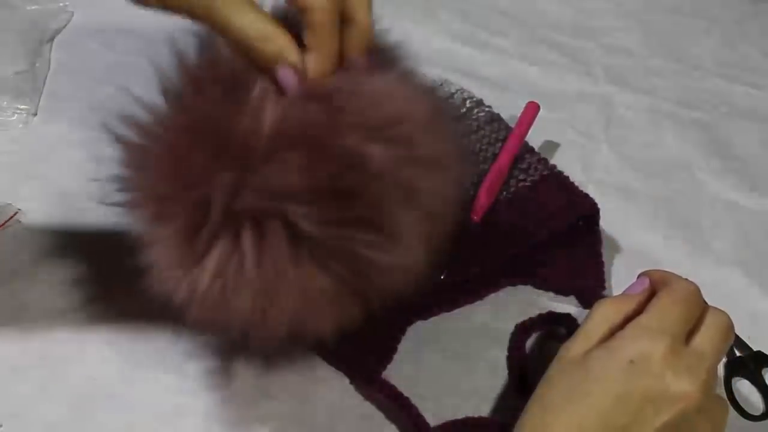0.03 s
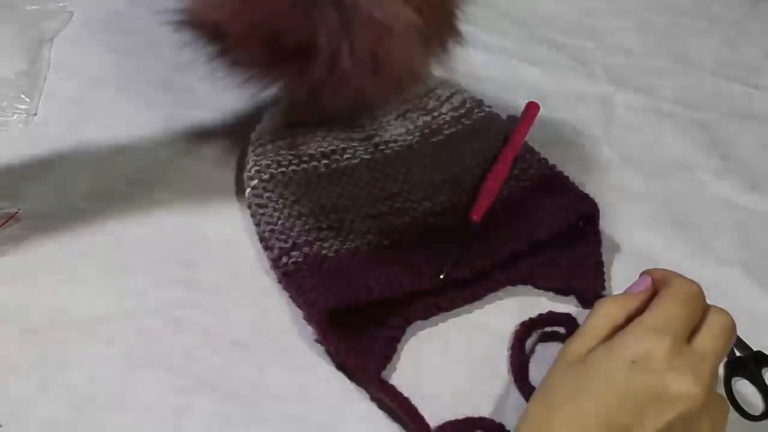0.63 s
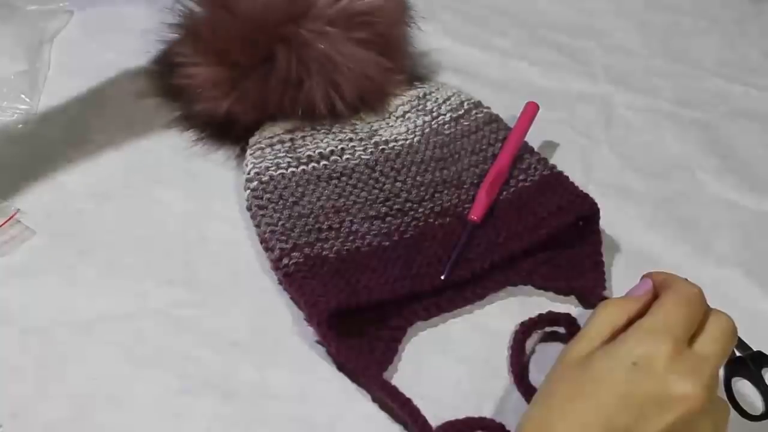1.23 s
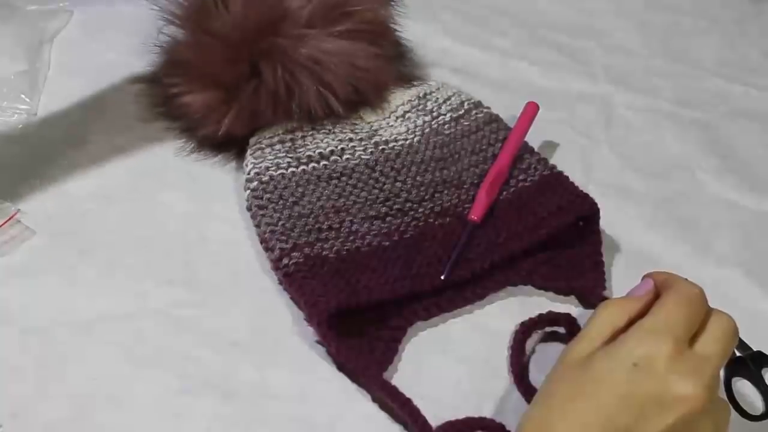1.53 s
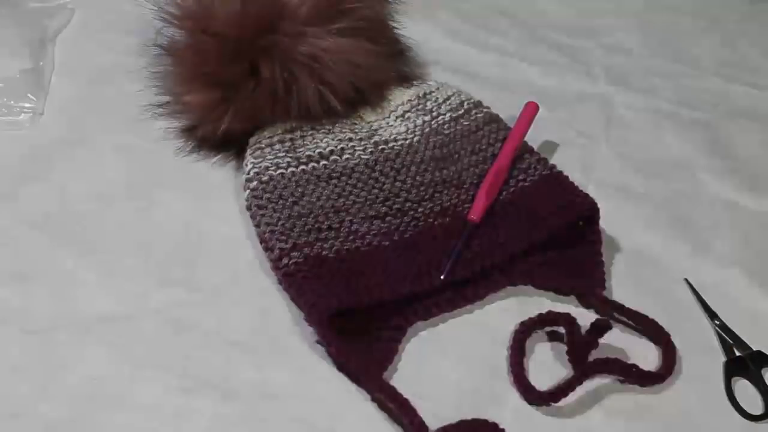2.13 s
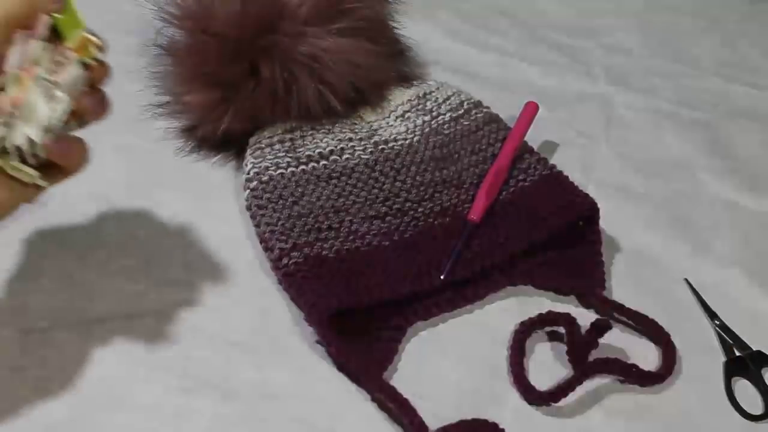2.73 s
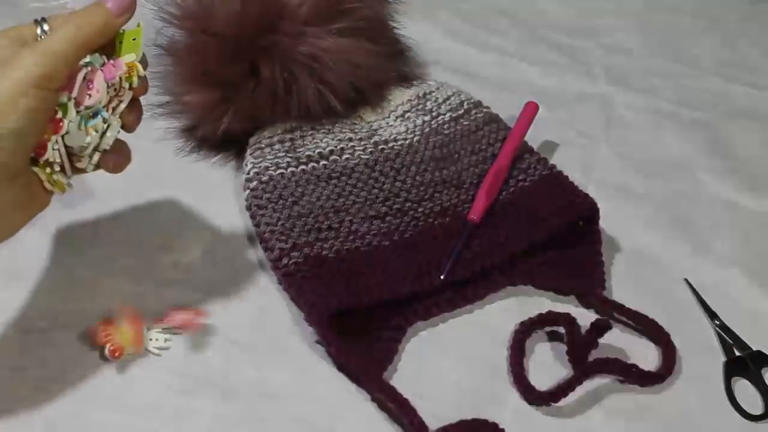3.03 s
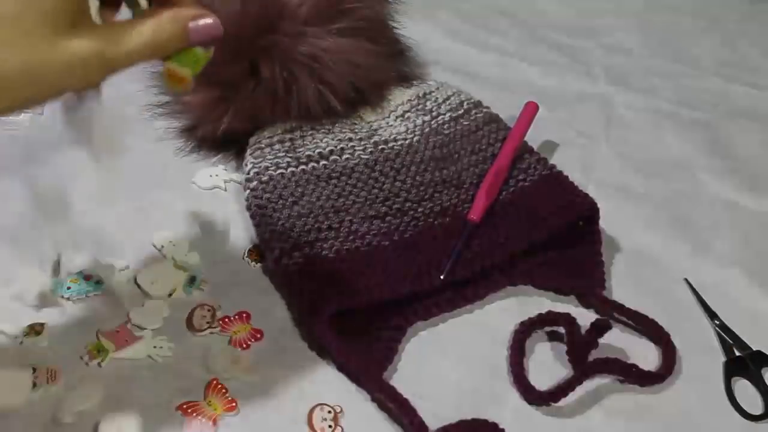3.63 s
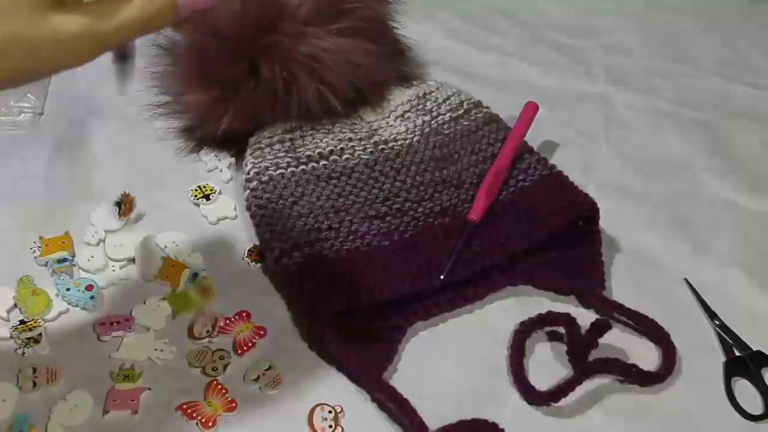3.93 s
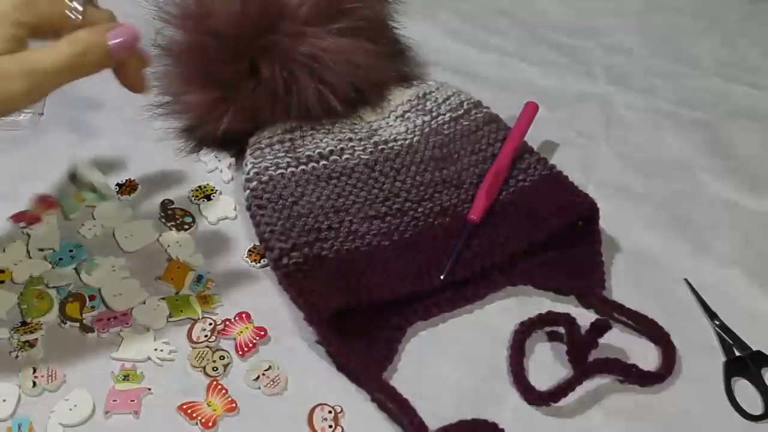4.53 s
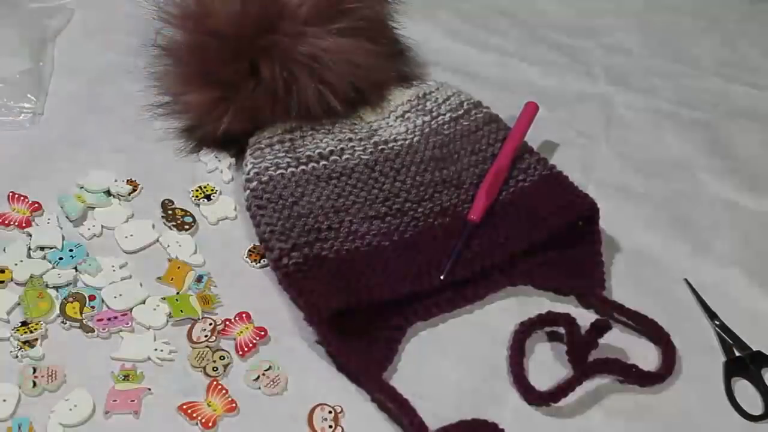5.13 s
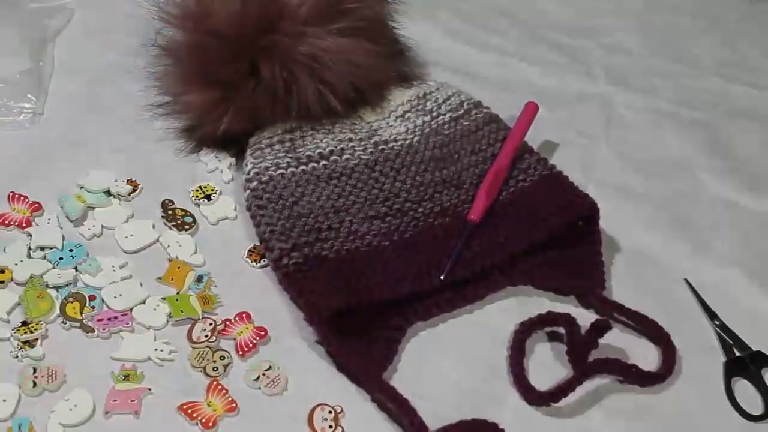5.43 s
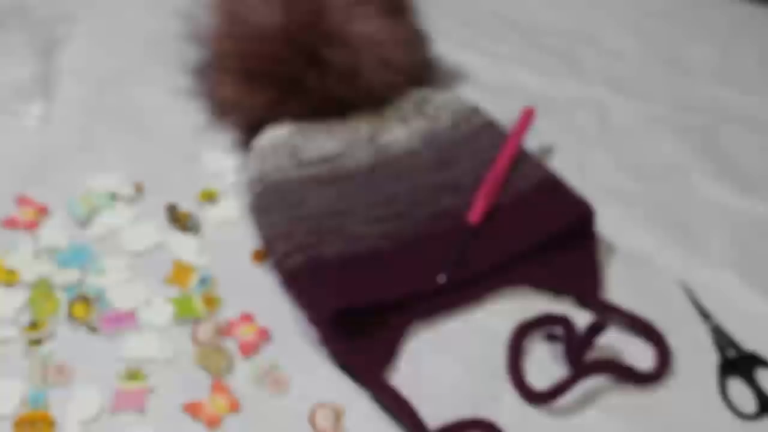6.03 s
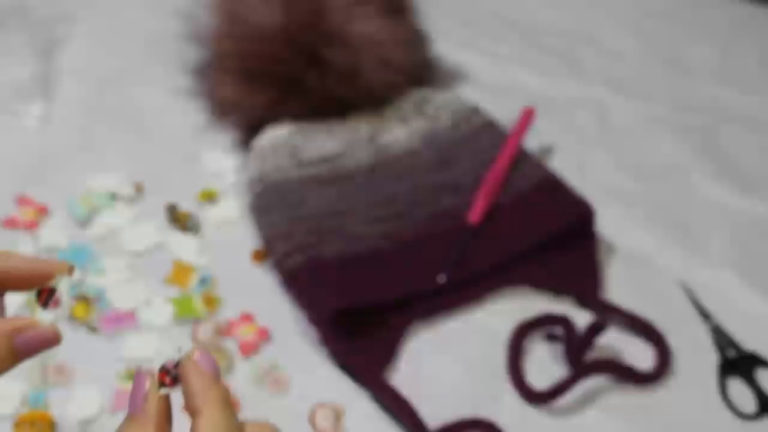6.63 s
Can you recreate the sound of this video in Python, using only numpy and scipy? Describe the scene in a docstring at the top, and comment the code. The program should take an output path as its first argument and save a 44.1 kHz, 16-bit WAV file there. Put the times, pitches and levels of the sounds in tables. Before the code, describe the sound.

Soft, steady room noise opens, with a few faint high ticks in the first second and a gentle swish of a fur pompom being set down at about 1.2 seconds. At 1.7 seconds the noise drops abruptly to near silence. A hand rustles lightly just before 3 seconds, and a handful of small, flat, hard buttons starts falling onto a cloth-covered table. A few click down first, there is a brief lull, and from 3.4 seconds comes a dense, bright clatter with dull cushioned pats underneath. The sharpest clicks slightly overload the microphone, and the small room adds a short reverberation. Last spurts with a thin, high jingle follow from 4 seconds until the heap settles at about 4.8 seconds. Faint hiss and a low hum remain, dipping briefly near 6 seconds. Hands rustle softly over the cloth at around 6.8 seconds.

```python
"""Room noise is heard first, with a few faint ticks and a soft brush of fur; then it drops at once.
Hands rustle, and a handful of flat, hard buttons is tipped onto a cloth-covered table in a small room.
Collisions excite the buttons' bending modes as bright clicks; landings, cushioned by the cloth, drive
the table's modes as dull pats. The sharpest clicks overload the microphone. A faint hum follows."""
import sys
import numpy as np
from scipy import signal
from scipy.fft import rfft, irfft
from scipy.io import wavfile
from scipy.ndimage import uniform_filter1d

SR = 44100
rng = np.random.default_rng(int(sys.argv[2]) if len(sys.argv) > 2 else 0)


def persist_wave(psi):
    """Save psi, clipped to +-1, as 16-bit WAV."""
    counts = np.round(np.clip(psi, -1, 1) * 32767).astype(np.int16)
    wavfile.write(sys.argv[1], SR, np.atleast_2d(counts).T)


N = 303408
TIME = np.arange(N) / SR
DROP_S, TIPPED_S, SETTLED_S = 1.727, 2.95, 4.765   # the noise drops; the hand opens; the heap lies still


def from_db(db):
    """Decibels to amplitude ratio."""
    return 10 ** (np.asarray(db) / 20)


def unit_rms(x):
    """Normalisation to rms 1."""
    return x / np.sqrt(np.mean(x ** 2) + 1e-20)


def curves(rows):
    """Linear interpolation of each column over the times in the first."""
    times, *columns = np.transpose(rows)
    return [np.interp(TIME, times, column) for column in columns]


def add(out, start_s, sound):
    """Superposition of a sound from a given time."""
    at = int(start_s * SR)
    out[at:at + len(sound)] += sound[:N - at]


def cut(x, hz, kind, order=2):
    """Butterworth high- or low-pass filter."""
    return signal.sosfilt(signal.butter(order, hz, kind, fs=SR, output="sos"), x)


def decay(t, t60_s):
    """Exponential damping, 60 dB in t60_s."""
    return np.exp(-np.log(1000) * t / t60_s)


def ring(impulses, hz, t60_s):
    """Damped resonator: each impulse starts a decaying sine."""
    radius, angle = from_db(-60 / (t60_s * SR)), 2 * np.pi * hz / SR
    feedback = [1, -2 * radius * np.cos(angle), radius ** 2]
    return signal.lfilter([0, np.sin(angle)], feedback, impulses + 1e-18)


def noise(spectrum):
    """Spectral shaping of white noise, rms 1."""
    hz, db = np.transpose(spectrum)
    bins_hz = np.maximum(np.fft.rfftfreq(N, 1 / SR), 1)
    gain = from_db(np.interp(np.log(bins_hz), np.log(hz), db))
    return unit_rms(irfft(rfft(rng.standard_normal(N)) * gain, N))


def waver(x, depth_db, width_hz, length_s=0.13):
    """Random amplitude modulation: narrow bands swell and fade on their own; rms 1."""
    frames = dict(fs=SR, nperseg=2048, noverlap=1536)
    hz, times, cells = signal.stft(x, **frames)
    field = rng.standard_normal(cells.shape)
    for axis, span in enumerate([width_hz / hz[1], length_s / times[1]]):
        for _ in range(2):
            field = uniform_filter1d(field, max(int(round(span)), 1), axis=axis)
    _, modulated = signal.istft(cells * from_db(depth_db * unit_rms(field)), **frames)
    return unit_rms(modulated[:N])


def swells(rows):
    """Envelope of exponential rises and falls about each peak."""
    return sum(from_db(np.maximum(db - np.maximum(rise * (s - TIME), fall * (TIME - s)), -200))
               for s, db, rise, fall in rows)


# spectrum of the opening room noise: frequency_hz, level_db
LOUD_AIR_SPECTRUM = [(24, -64), (40, -24.5), (87, -33.5), (108, -15.5), (213, -11), (294, -0.5), (368, -8),
                     (562, -5), (838, -10), (973, -17.5), (1080, -14.5), (3650, -25.5), (7910, -31),
                     (10400, -38), (15500, -38)]

def loud_air(level_db=-47.5):
    """Broadband room noise, strongest in the low hundreds of hertz, wavers slowly."""
    return from_db(level_db) * waver(noise(LOUD_AIR_SPECTRUM), depth_db=2.5, width_hz=40, length_s=1.0)


# faint, distant ticks: start_s, level_db
TICKS = [(0.0194, -50), (0.177, -48.5), (0.4045, -48), (0.5287, -47.5), (0.7983, -47), (0.9636, -48)]
# spectrum of their ringing: frequency_hz, level_db
TICK_SPECTRUM = [(3000, -18.5), (6500, -11.5), (7500, -5.5), (7950, 0.5), (8500, -11), (9500, -8.5),
                 (11000, -28.5), (16000, -24.5)]

def ticks(gain_db=-8, t60_s=0.235):
    """Free decay: each tick starts abruptly and rings down in a high band."""
    envelope, t = np.zeros(N), np.arange(SR // 2) / SR
    for start_s, db in TICKS:
        add(envelope, start_s, from_db(db + gain_db) * decay(t, t60_s))
    return envelope * noise(TICK_SPECTRUM)


# stroke of fur on the table: peak_s, level_db, rise_db_per_s, fall_db_per_s
FUR_STROKE = [(1.165, -50, 195.5, 279)]
# spectrum of the stroke: frequency_hz, level_db
FUR_SPECTRUM = [(2000, -25.5), (3300, -5), (4200, 2.5), (6000, 0), (9000, -3.5), (16000, -21)]

def fur_brush():
    """Friction noise: a fur pompom swishes as it is set down."""
    return swells(FUR_STROKE) * noise(FUR_SPECTRUM)


# thin tones in the hiss: peak_s, pitch_hz, length_s, level_db
WISPS = [(1.894, 1720, 0.049, -71), (2.012, 1519, 0.036, -65), (1.991, 4107, 0.143, -76.5),
         (2.152, 581, 0.064, -60), (5.193, 586, 0.055, -56.5), (5.29, 4300, 0.111, -66)]

def wisps(width_hz=110):
    """Narrowband noise under a Gaussian envelope is heard as a faint, passing pitch."""
    out = np.zeros(N)
    for peak_s, hz, length_s, db in WISPS:
        band = [(hz + step * width_hz, skirt_db)
                for step, skirt_db in [(-2, -90), (-1, -14), (0, 0), (1, -14), (2, -90)]]
        out += from_db(db) * np.exp(-2 * ((TIME - peak_s) / length_s) ** 2) * noise(band)
    return out


# spectra of the quiet room's low noise and of its hiss: frequency_hz, level_db
QUIET_AIR_SPECTRUM = [(40, -30.5), (90, -27.5), (140, -7), (210, -6), (285, 0), (400, -5.5), (570, -2),
                      (750, -9), (1000, -13), (1500, -11.5), (3000, -45.5)]
HISS_SPECTRUM = [(600, -20.5), (1100, -5), (1500, 2), (2300, 5), (3200, 1.5), (4400, -1), (6500, -7),
                 (8000, -15), (11000, -29), (16000, -44)]
# background levels, in one group before the pour and one after: time_s, air_db, hiss_db
QUIET_LEVELS = [
    [(1.74, -69.5, -78.5), (1.922, -62.5, -72.5), (2.75, -62.5, -73)],
    [(4.9, -59, -62), (5.918, -59.5, -66), (6.65, -56.5, -61)],
]

def quiet_air(hum_hz=115.6, hum_to_air_db=-15.5, hum_from_s=4.7, white_db=-81.5, dip_db=-9.5):
    """Noise floor: low room noise, hiss and, later, mains hum superpose; the level dips briefly."""
    air_db, hiss_db = curves(np.vstack(QUIET_LEVELS))
    hum = from_db(hum_to_air_db) * np.sqrt(2) * np.sin(2 * np.pi * hum_hz * TIME) * (TIME > hum_from_s)
    air = waver(noise(QUIET_AIR_SPECTRUM), depth_db=3.5, width_hz=50)
    hiss = waver(noise(HISS_SPECTRUM), depth_db=3.5, width_hz=130, length_s=0.11)
    white = from_db(white_db) * rng.standard_normal(N)
    dip = from_db(dip_db * np.interp(TIME, [5.925, 5.94, 6.03, 6.08], [0, 1, 1, 0]))
    return (from_db(air_db) * (air + hum) + from_db(hiss_db) * hiss + white + wisps()) * dip


# hands move at the pour, then reach for the buttons: peak_s, level_db, rise_db_per_s, fall_db_per_s
HAND_STROKES = [(2.66, -67, 203.5, 70), (2.98, -49.5, 117, 299), (6.83, -53.5, 95.5, 37)]
# spectrum of skin on cloth: frequency_hz, level_db
HAND_SPECTRUM = [(900, -38.5), (2000, 3.5), (3500, -1), (6500, -2.5), (8000, -26), (12000, -36)]

def hands():
    """Sliding friction: skin rustles over the cloth."""
    return swells(HAND_STROKES) * waver(noise(HAND_SPECTRUM), depth_db=2.5, width_hz=200)


# the pour (a few buttons, a pause, the rush, last spurts): time_s, flow_db, treble_over_middle_db
FLOW = [(2.78, -75.5, -7.5), (2.9, -54, -6.5), (3.0, -38.5, -11.5), (3.13, -31, -11), (3.25, -40.5, -10),
        (3.38, -33.5, 6), (3.48, -29, -7.5), (3.63, -20, -1), (3.8, -23, -1.5), (4.01, -32, 1.5),
        (4.1, -26, 3), (4.23, -36, -7.5), (4.43, -24.5, -2.5), (4.63, -29.5, -2), (4.73, -41, -11),
        (4.81, -71, -42)]
SLIDING = (TIME > FLOW[0][0]) & (TIME < SETTLED_S)
# bending modes of a typical button: pitch_hz, level_db
BUTTON_MODES = [(3100, -6), (3700, -1), (4150, -2.5), (5300, 0), (6100, 1.5), (6650, 4.5), (7300, -4.5),
                (8050, -1), (8860, 0), (9640, -0.5), (11300, -2), (12100, -3.5), (13400, -4.5),
                (14400, -3.5), (15400, -7)]

def sliding_heap(contacts_per_s=1100, force_spread_db=3, t60_s=0.0063, sizes=4, pitch_spread=0.1):
    """Random impulse excitation: light contacts ring buttons of several sizes as the heap slides."""
    flow_db, bright_db = curves(FLOW)
    touching = rng.random(N) < contacts_per_s / SR
    force = from_db(force_spread_db * np.minimum(rng.exponential(1, N), 4))
    contacts = (touching * force)[SLIDING]
    struck_size = rng.integers(0, sizes, N)[SLIDING]
    couplings = rng.standard_normal((len(BUTTON_MODES), N))[:, SLIDING]
    middle, treble = np.zeros((2, len(contacts)))
    for size in range(sizes):
        for (hz, db), coupling in zip(BUTTON_MODES, couplings):
            band = treble if hz > 7700 else middle
            pitch_hz = hz * np.exp(pitch_spread * rng.standard_normal())
            band += from_db(db) * ring(contacts * (struck_size == size) * coupling, pitch_hz, t60_s)
    out = np.zeros(N)
    out[SLIDING] = from_db(-1.0645) * unit_rms(middle)
    out[SLIDING] += from_db(bright_db[SLIDING] - 2.55) * unit_rms(treble)
    return cut(from_db(flow_db) * out, 1500, "high")


def knock(level_db, main_hz, flow_bright_db, middle_hz=6500, pitch_spread=0.05, mode_spread_db=3.5,
          linger_db=-27, rebound_db=-11, rise_s=0.0001, hardest_db=-5):
    """Impact on a plate: a broadband crack, freely decaying bending modes and an immediate rebound."""
    t = np.arange(SR // 10) / SR
    mode_hz, mode_db = np.transpose(BUTTON_MODES)
    # a small, high button rings brighter and longer than a large, low one
    octaves = np.log2(main_hz / middle_hz)
    bright_db = 8 + 16.5 * octaves + flow_bright_db
    t60_s = 0.0095 * 1.35 ** min(octaves, 0)
    hz = mode_hz * np.exp(pitch_spread * rng.standard_normal(len(mode_hz)))
    tilt_db = bright_db * np.clip(np.log2(hz / middle_hz), -0.75, 0.75) / 1.5
    gains = from_db(mode_db + tilt_db + mode_spread_db * rng.standard_normal(len(hz)))
    gains *= rng.choice([-1, 1], len(hz)) / np.linalg.norm(gains)
    modes = gains @ np.sin(2 * np.pi * hz[:, None] * t)
    main_mode = 0.709 * np.sin(2 * np.pi * main_hz * t)
    sound = (modes + main_mode) * decay(t, t60_s)
    if main_hz > 9000:   # neighbours damp the low modes at once; a high one lingers
        sound += from_db(linger_db) * main_mode * decay(t, t60_s=0.12)
    crack_db = -0.5 + 3 * min(octaves, 0)
    sound += from_db(crack_db) * rng.standard_normal(len(t)) * decay(t, t60_s=0.0018)
    rebound_lag = int(rng.uniform(0.059, 0.3) * t60_s * SR) + 1
    sound += from_db(rebound_db) * np.pad(sound, (rebound_lag, 0))[:len(t)]
    sound *= 1 - np.exp(-t / rise_s)
    sound = cut(sound, 2300, "high", order=3)   # so small a plate radiates no bass
    onset_rms = np.sqrt(np.mean(sound[t < 0.003] ** 2))
    return sound / onset_rms * from_db(min(level_db, hardest_db))   # the hardest knocks are held to a common ceiling


# main collisions of button on button: start_s, level_db, pitch_hz, touch_count
KNOCKS = [(2.842, -47, 6100, 1), (2.883, -43, 2900, 1), (2.937, -30.5, 5820, 1), (2.9848, -20, 6760, 1),
          (3.016, -15, 3966, 1), (3.019, -11.5, 3900, 1), (3.0274, -11.5, 2916, 1), (3.038, -22, 4270, 1),
          (3.07, -13.5, 4097, 2), (3.076, -16.5, 7010, 2), (3.103, -6, 6719, 1), (3.109, -15, 7000, 1),
          (3.142, -14, 6800, 2), (3.172, -18, 6570, 1), (3.179, -20.5, 6190, 1), (3.199, -20, 11420, 1),
          (3.207, -10, 11600, 1), (3.272, -23.5, 4655, 3), (3.297, -24.5, 6780, 2), (3.446, -19, 4580, 1),
          (3.454, -18, 4920, 1), (3.488, -13, 4130, 1), (3.4964, -10.5, 4540, 1), (3.5002, -9.5, 11380, 1),
          (3.508, -7, 6476, 1), (3.523, -10, 8613, 3), (3.538, -11.5, 8660, 1), (3.556, -10, 6500, 1),
          (3.593, -9, 6555, 3), (3.618, -15, 12600, 2), (3.63, -10.5, 7364, 2), (3.647, -15.5, 7070, 3),
          (3.712, -7.5, 10150, 1), (3.736, -14.5, 6500, 2), (3.773, -10, 9190, 2), (3.787, -12, 6120, 2),
          (3.812, -11, 10100, 2), (3.837, -11, 7570, 2), (3.866, -14, 9810, 1), (3.875, -9, 9600, 2),
          (3.909, -11.5, 6500, 1), (3.948, -9.5, 8412, 3), (3.959, -14, 5467, 2), (3.971, -7.5, 9920, 1),
          (4.059, -7.5, 7026, 2), (4.105, -11, 7570, 1), (4.113, -9.5, 5920, 1), (4.128, -14, 12300, 1),
          (4.156, -9, 8530, 1), (4.219, -12, 5760, 1), (4.237, -15.5, 5930, 1), (4.273, -7, 3654, 1),
          (4.283, -11.5, 10270, 1), (4.316, -15.5, 7610, 2), (4.376, -11, 6480, 1), (4.382, -10, 4097, 2),
          (4.394, -10, 3860, 2), (4.408, -13, 3861, 1), (4.448, -7.5, 9310, 1), (4.463, -10, 9540, 1),
          (4.485, -10.5, 9550, 1), (4.54, -16.5, 6200, 1), (4.564, -13.5, 6250, 2), (4.594, -7, 11650, 2),
          (4.638, -15.5, 6060, 3), (4.744, -27, 9520, 1), (4.769, -40.5, 3440, 1), (4.791, -45.5, 3882, 1)]

def main_knocks(gain_db=-1, chatter_gap_s=0.0038, loss_per_touch_db=1):
    """Contact chatter: some collisions repeat within milliseconds, losing energy at each touch."""
    out = np.zeros(N)
    _, bright_db = curves(FLOW)
    for start_s, db, main_hz, touches in KNOCKS:
        force_db = db + gain_db + 2 * np.clip((db + 13) / 4, 0, 1)   # the hardest gain up to 2 dB
        for touch in range(round(touches)):
            touch_db = force_db - loss_per_touch_db * touch
            add(out, start_s, knock(touch_db, main_hz, bright_db[int(start_s * SR)]))
            start_s += chatter_gap_s * rng.uniform(0.6, 1.4)
    return out


def stray_knocks(count=34, over_flow_db=8.5, spread_db=5):
    """Random impacts throughout the pour follow the flow in strength and brightness."""
    out = np.zeros(N)
    flow_db, bright_db = curves(FLOW)
    starts = TIPPED_S + (SETTLED_S - TIPPED_S) * (np.arange(count) + rng.random(count)) / count
    pitches = rng.choice([hz for hz, _ in BUTTON_MODES if hz < 12500], count)
    for start_s, main_hz, offset_db in zip(starts, pitches, rng.uniform(-spread_db, spread_db, count)):
        at = int(start_s * SR)
        add(out, start_s, knock(flow_db[at] + over_flow_db + offset_db, main_hz, bright_db[at]))
    return out


# buttons landing on the cloth: start_s, level_db
LANDINGS = [(2.982, -38), (3.015, -26), (3.068, -25.5), (3.1, -26.5), (3.451, -28), (3.49, -26),
            (3.583, -28.5), (3.628, -22.5), (3.686, -18.5), (3.754, -18.5), (3.858, -32), (3.947, -36),
            (4.057, -34), (4.123, -37), (4.27, -26.5), (4.379, -28), (4.408, -26), (4.458, -41),
            (4.552, -23.5), (4.594, -31.5), (4.627, -31)]
# crowded modes of the padded table, as one spectrum: frequency_hz, level_db
TABLE_SPECTRUM = [(60, -28.5), (130, -18), (220, -11), (310, -4), (460, 1.5), (630, -4.5), (800, -0.5),
                  (980, -2), (1300, -6), (2200, -5), (4000, -30.5)]

def landings(gain_db=-4, touches=3, mean_gap_s=0.01504, loss_per_touch_db=6, rise_s=0.0015, slide_db=-23):
    """Cushioned impact: buttons land on edge and flop flat; their energies add in the damped table."""
    flow_db, _ = curves(FLOW)
    energy = from_db(flow_db + slide_db) ** 2 * SLIDING   # the sliding heap drives the table too
    t = np.arange(SR // 4) / SR
    pat = (1 - np.exp(-t / rise_s)) * decay(t, t60_s=0.0908)
    for start_s, db in LANDINGS:
        for touch, gap_s in enumerate(rng.exponential(mean_gap_s, touches)):
            add(energy, start_s, (from_db(db + gain_db - loss_per_touch_db * touch) * pat) ** 2)
            start_s += gap_s
    return np.sqrt(energy) * noise(TABLE_SPECTRUM)


# modes of a thin button on top of the heap: pitch_hz, level_db
JINGLE_MODES = [(9530, 3.5), (9650, -1.5), (9800, -6), (11550, -12.5), (13100, -13.5)]
# jostles of that button: peak_s, level_db
JOSTLES = [(3.98, -25.5), (4.29, -27.5), (4.48, -23.5), (4.605, -27)]

def jingle(touches_per_s=110, t60_s=0.025, rise_db_per_s=600, fall_db_per_s=150):
    """Repeated excitation: a loose button rings at its natural frequencies until the heap lies still."""
    touches = (rng.random(N) < touches_per_s / SR) & (TIME < SETTLED_S)
    ringing = sum(from_db(db) * ring(touches * rng.standard_normal(N), hz, t60_s)
                  for hz, db in JINGLE_MODES)
    envelope = swells([(peak_s, db, rise_db_per_s, fall_db_per_s) for peak_s, db in JOSTLES])
    return ringing / np.std(ringing[touches]) * envelope


def room(direct, reverb_db=-13, nearest_wall_s=0.0044, bass_t60_s=0.28, treble_t60_s=0.21, treble_db=-2):
    """Reverberation: dense reflections in a small furnished room; the treble dies away sooner than the bass."""
    t = np.arange(SR // 2) / SR
    echoes = cut(rng.standard_normal(len(t)), 12000, "low", order=1) * (t > nearest_wall_s)
    bass = cut(echoes, 1500, "low", order=1)
    tail = bass * decay(t, bass_t60_s) + from_db(treble_db) * (echoes - bass) * decay(t, treble_t60_s)
    return direct + from_db(reverb_db) * signal.fftconvolve(direct, tail / np.linalg.norm(tail))[:N]


def scene():
    """Superposition of the background, the handling sounds and the reverberant pour, in mono."""
    before_drop = np.clip((DROP_S - TIME) / 0.003, 0, 1)
    background = (1 - before_drop) * quiet_air() + before_drop * loud_air()
    handling = (ticks() + fur_brush()) * (TIME < DROP_S) + hands()
    pour = sliding_heap() + jingle() + landings() + stray_knocks() + main_knocks()
    return (background + handling + room(pour))[None]


def record(dry, clip_level=0.95, low_hz=40, top_hz=16000):
    """Clipping and band limiting: the loudest clicks overload; the bass is thinned and the top is cut."""
    clipped = np.clip(dry, -clip_level, clip_level)
    thinned = cut(clipped, low_hz, "high", order=1)
    return signal.sosfilt(signal.ellip(10, 0.2, 70, top_hz, fs=SR, output="sos"), thinned)


dry = scene()
out = record(dry)
persist_wave(out)
```